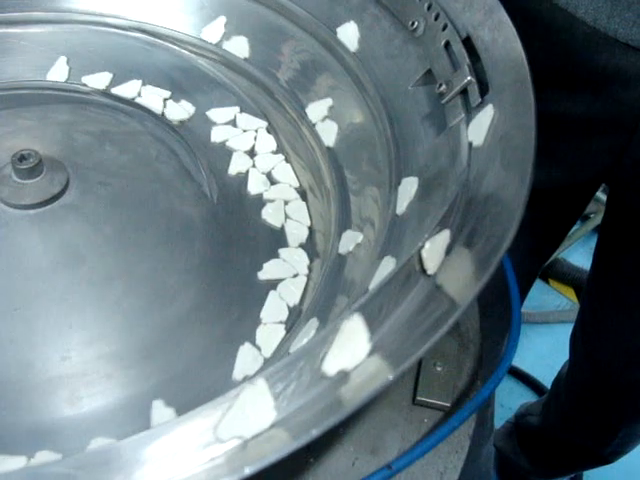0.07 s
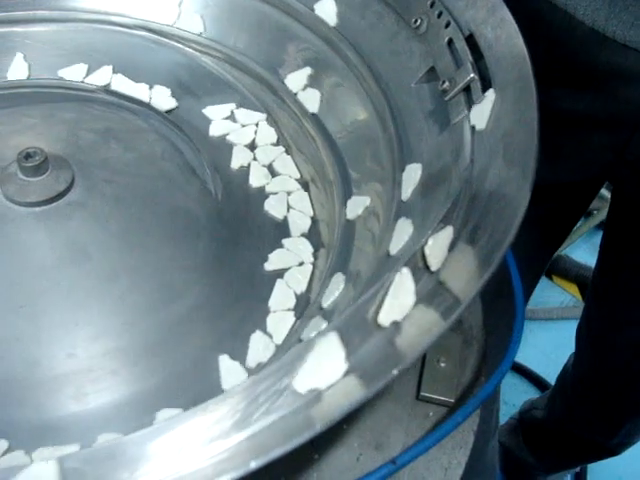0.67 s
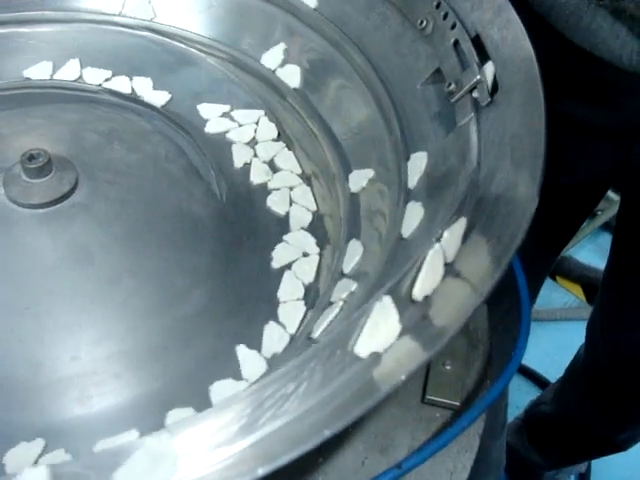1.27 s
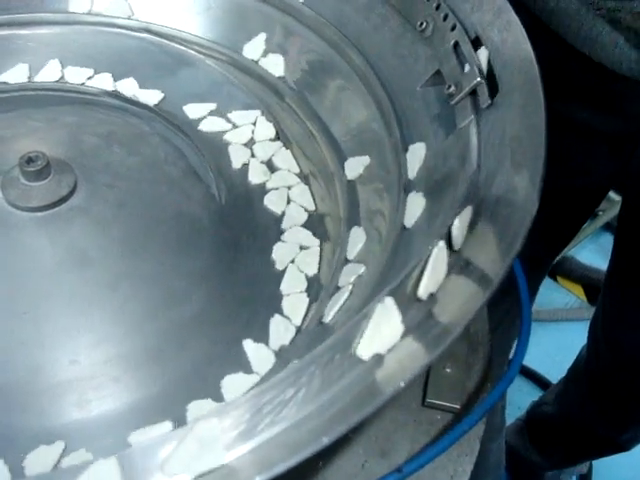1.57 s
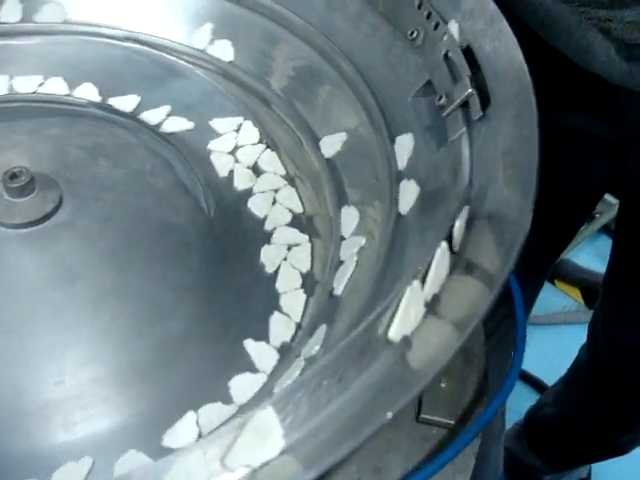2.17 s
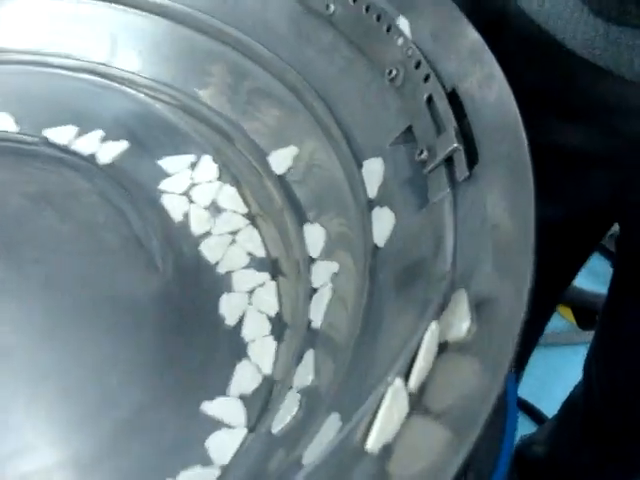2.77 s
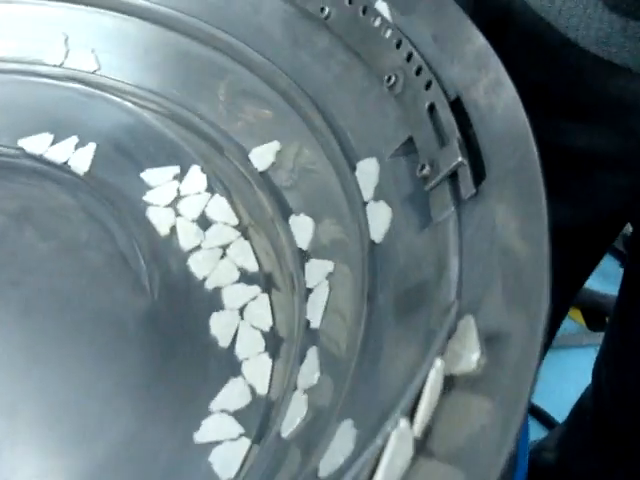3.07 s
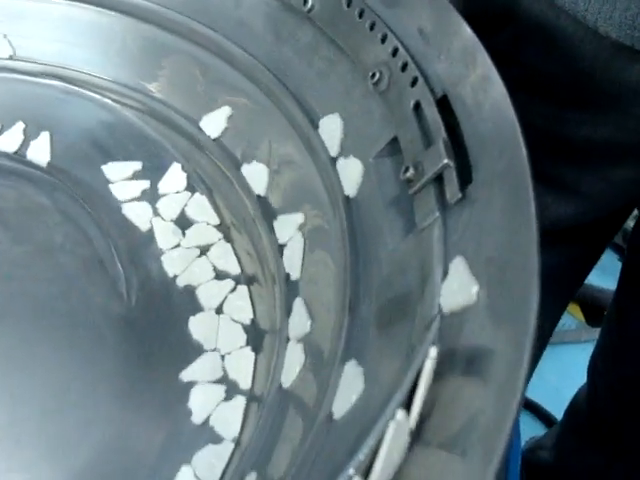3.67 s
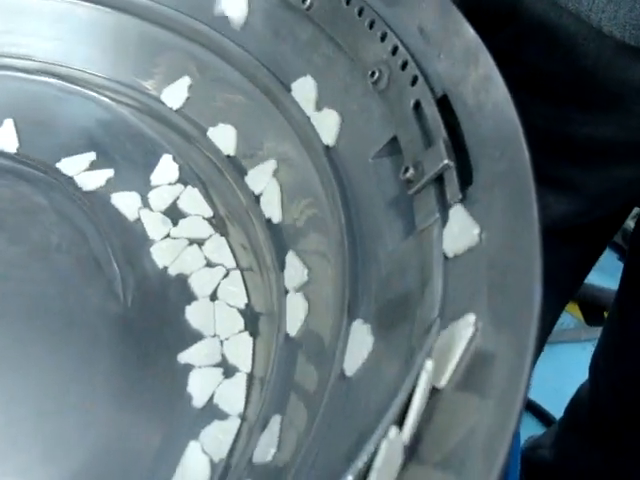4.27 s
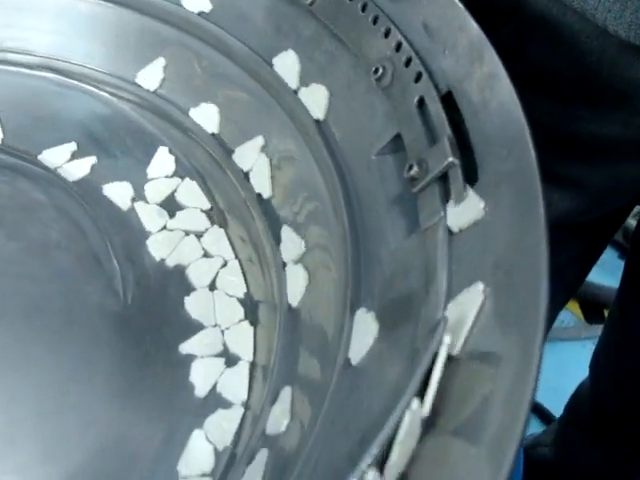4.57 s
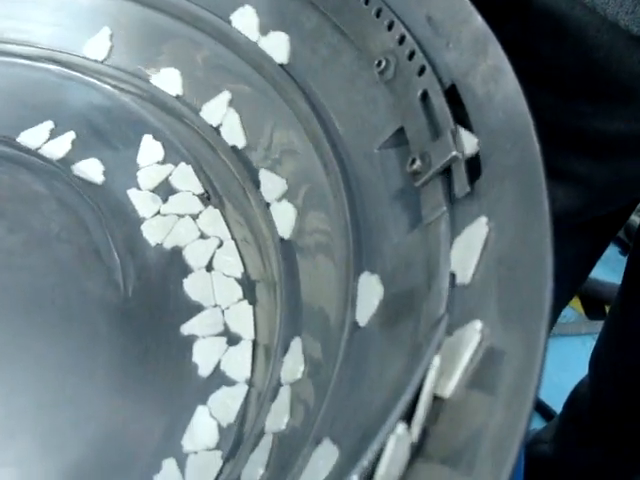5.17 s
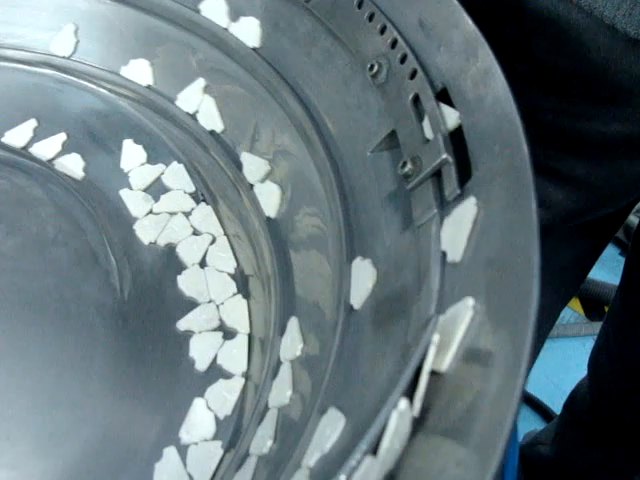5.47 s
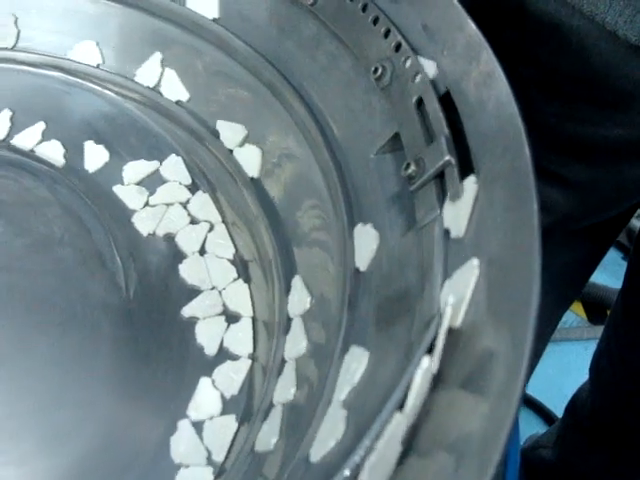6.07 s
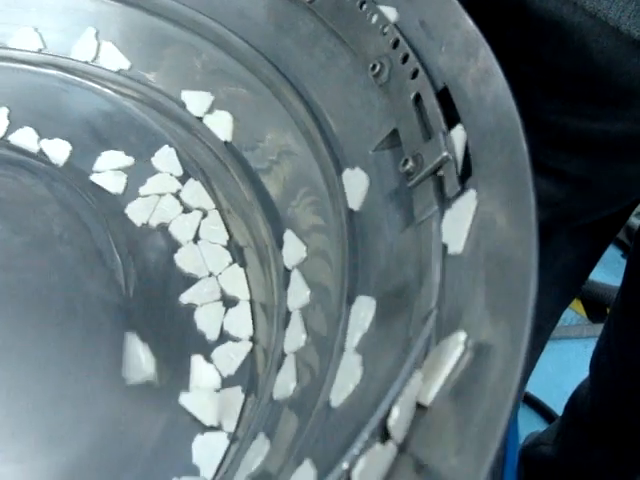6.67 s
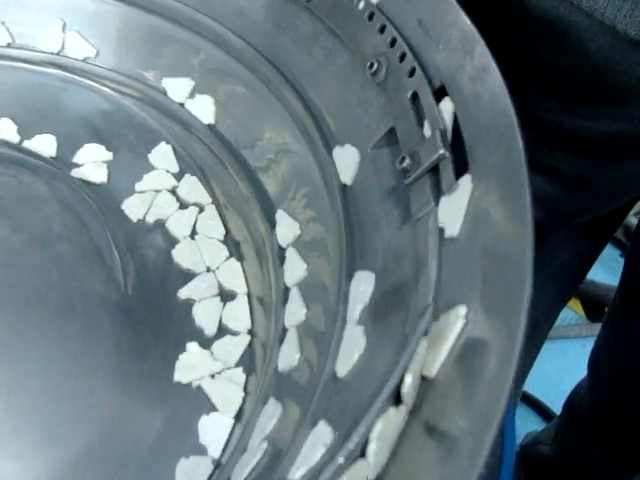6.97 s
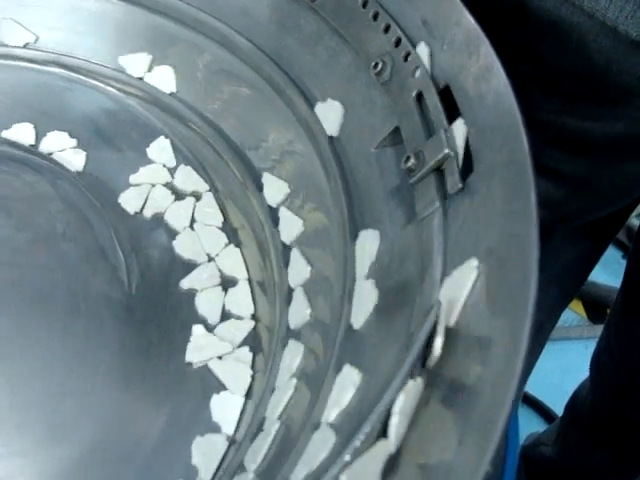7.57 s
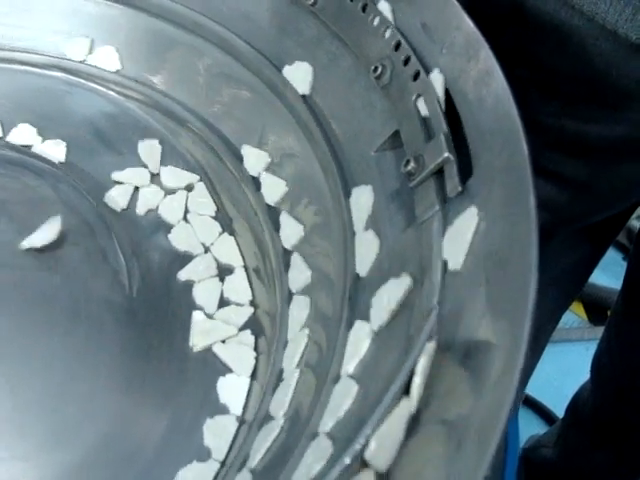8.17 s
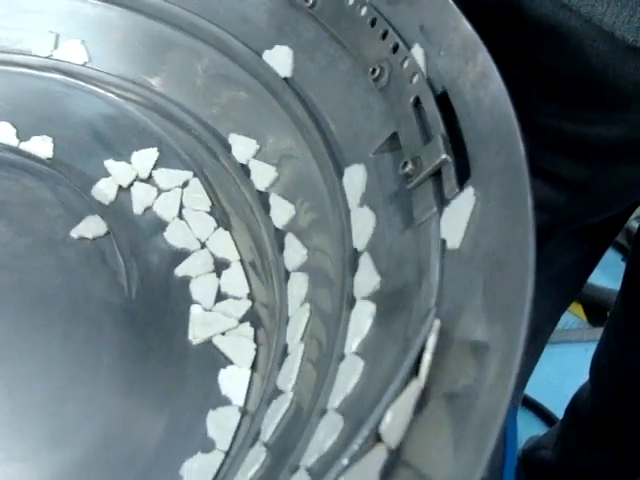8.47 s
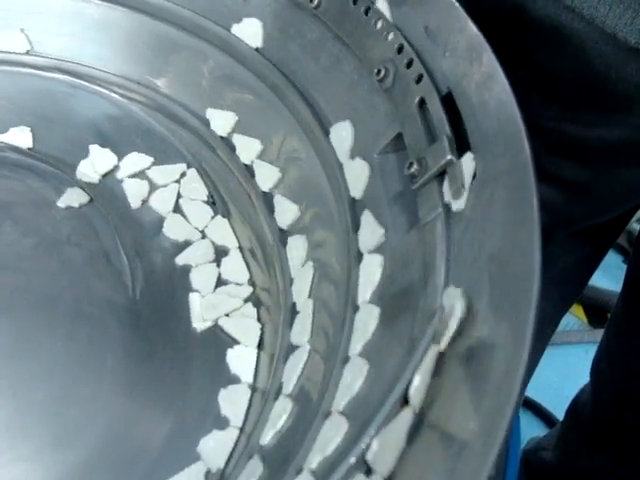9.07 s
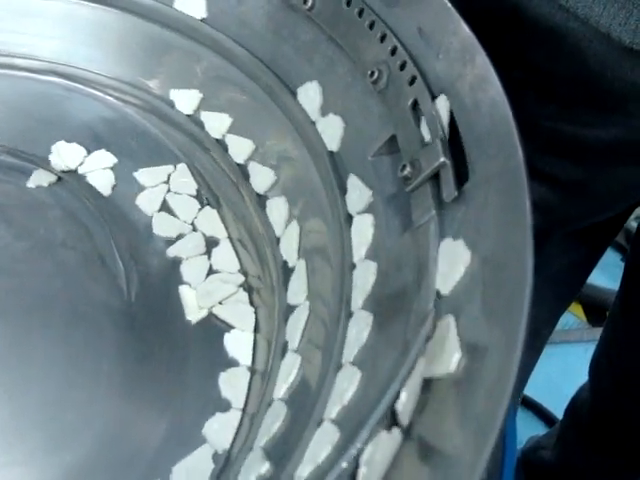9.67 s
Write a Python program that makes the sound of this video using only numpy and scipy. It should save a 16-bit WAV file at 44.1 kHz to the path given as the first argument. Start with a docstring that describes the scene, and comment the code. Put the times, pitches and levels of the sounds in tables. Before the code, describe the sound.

A vibrating steel feeder bowl rattles and buzzes loudly and steadily, with small ceramic pieces chattering along its tracks.

```python
"""A vibratory bowl feeder shakes small ceramic pieces up its steel tracks, heard close by in a workshop.
From the start the magnet drive hums, the bowl knocks at both ends of its stroke and the pieces hop and
land; a wall mode sings, slipping out of step and surging back. From about 1 s pieces bunch up at times.
Between 2 and 4 s the microphone moves from beside the rim, through a quiet zone, to over the bowl.
Near 6.6 and 7.9 s a rejected piece drops to the bowl's floor with a soft thud."""
import sys
import numpy as np
from scipy import signal
from scipy.fft import rfft, irfft
from scipy.io import wavfile
from scipy.ndimage import uniform_filter1d

SR = 44100
rng = np.random.default_rng(int(sys.argv[2]) if len(sys.argv) > 2 else 0)


def pcm_store(signal):
    """Save signal as 16-bit PCM."""
    levels = np.round(np.clip(np.atleast_2d(signal), -1, 1) * 32767)
    wavfile.write(sys.argv[1], SR, levels.astype(np.int16).T)


N = 437031
T = np.arange(N) / SR
MAINS_HZ = 50.05  # one stroke per mains cycle
FLEX_ORDER, SING_ORDER = 6, 14  # multiples of the mains

# rejected pieces drop to the bowl's floor: t/s, thud level/dB
DROPS = [(6.635, -43), (7.94, -54)]


def undb(db):
    """Decibels to gain."""
    return 10 ** (np.asarray(db) / 20)


def unit(x):
    """Scale to rms 1."""
    return x / np.sqrt(np.mean(x ** 2))


def curve(table, t=T):
    """The columns of a table, joined by straight lines in time."""
    times, *columns = np.transpose(table)
    return [np.interp(t, times, column) for column in columns]


def walk(rate_hz):
    """Smooth random wander with rms 1."""
    coarse = T[::100]
    f = np.fft.rfftfreq(len(coarse), coarse[1])
    spectrum = rfft(rng.standard_normal(len(coarse))) / (1 + (f / rate_hz) ** 4)
    return np.interp(T, coarse, unit(irfft(spectrum, len(coarse))))


def band(x, lo_hz, hi_hz):
    """Band-pass without phase shift."""
    return signal.sosfiltfilt(signal.butter(3, [lo_hz, hi_hz], "band", fs=SR, output="sos"), x)


def blend(over, at_rim, over_bowl):
    """Crossfade with the microphone's place: 0 beside the rim, 1 over the bowl."""
    return (1 - over) * at_rim + over * over_bowl


def hops(phase, spread, wander, scatter_db, swell_db):
    """One blow a stroke, now harder, now softer; phase, spread and wander are fractions of a stroke."""
    strokes = np.arange(int(N / SR * MAINS_HZ))
    drift, swell, jitter, force = rng.standard_normal((4, len(strokes)))
    drift, swell = (unit(uniform_filter1d(x, size=25)) for x in (drift, swell))
    at_s = (strokes + phase + wander * drift + spread * jitter) / MAINS_HZ
    return np.bincount((at_s * SR).astype(int) % N, undb(scatter_db * force + swell_db * swell), N)


def strike_steel(blows, t60, tick):
    """Blows on one spot of steel: each a hard tick, then a dense metallic ring."""
    t = T[:SR // 10]
    tail = rng.standard_normal(len(t)) * undb(-60 * t / t60)
    return signal.oaconvolve(blows, tail / np.linalg.norm(tail) + tick * (t == 0))[:N]


def landings(groups=20):
    """Groups of pieces land on their own spots of track: on the upstroke, on the return or anywhere."""
    out = 0
    for _ in range(groups):
        up = hops(rng.normal(.46, .06), spread=.03, wander=.04, scatter_db=3, swell_db=2.5)
        back = hops(rng.normal(.9, .05), spread=.03, wander=.04, scatter_db=4, swell_db=1)
        loose = sum(hops(rng.random(), spread=.15, wander=.15, scatter_db=3, swell_db=2.5)
                    for _ in range(2))
        out = out + strike_steel(up + undb(-3.5) * back + undb(-3) * loose, t60=.075, tick=.6)
    return unit(out) * undb(.61 * walk(28))  # the whole load shifts and settles


def clinks(lo_hz, hi_hz, t60, count=36):
    """Pieces jostle each other in fits; each gives a short ping at its own pitch."""
    t, out = T[:SR // 10], 0
    for hz in np.geomspace(lo_hz, hi_hz, count) * (1 + .018 * rng.standard_normal(count)):
        ping = np.sin(2 * np.pi * hz * t) * undb(-60 * t / t60)
        blows = hops(rng.random(), spread=.15, wander=.1, scatter_db=4.5, swell_db=-1)
        out = out + signal.oaconvolve(blows, ping)[:N]
    return unit(out)


def knocks():
    """The bowl strikes its stop at both ends of the stroke, with nearly exact timing."""
    main = hops(.32, spread=.0024, wander=.0027, scatter_db=.5, swell_db=2.2)
    back = hops(.78, spread=.0046, wander=.005, scatter_db=0, swell_db=1.4)
    steel = sum(strike_steel(blows, t60=.038, tick=.51) for blows in (main, undb(-3) * back))
    return unit(band(steel, 900, 5700))


def ring(blows, body, modes, peak_scale, width_scale, size=8192):
    """A resonator: a broad colour with ringing modes on top."""
    f = np.fft.rfftfreq(size, 1 / SR) + 1
    body_hz, body_db = np.transpose(body)
    db = np.interp(np.log(f), np.log(body_hz), body_db)
    for hz, width, peak in modes:
        db = db + peak_scale * peak / (1 + ((f - hz) / (width_scale * width)) ** 2)
    # minimum phase, so the ring follows the blow
    cepstrum = irfft(np.log(undb(db)))
    response = irfft(np.exp(rfft(2 * cepstrum[:size // 2], size)))
    return unit(signal.oaconvolve(blows, response)[:N])


def bowl(blows, over):
    """The steel bowl rings with one colour beside the rim and another from above."""
    # broad colour at each place: f/Hz, level/dB
    rim_body = [(150, -20), (250, -6.5), (450, -11.5), (700, -2), (1150, -7.5), (1900, -4.5), (2400, -7),
                (2700, -5), (3800, -0.5), (4400, -4), (5500, -3), (6300, -8), (7900, -5), (9900, -5)]
    over_body = [(150, -19), (250, -13.5), (450, -15), (700, -4), (1150, -8.5), (1500, -10.5), (2500, -6),
                 (3300, -1), (4000, -1.5), (5200, -4), (6400, -6.5), (7600, -6.5), (8700, -9), (9900, -7.5)]
    # bowl modes at each place, before scaling: f/Hz, width/Hz, peak over the body/dB
    rim_modes = [(1250, 29, -4), (1330, 200, 6.5), (1410, 32, 9), (1642, 94, 10), (1875, 62, 8.5),
                 (1960, 22, 8.5), (2260, 60, 5), (2302, 33, 9.5), (2623, 130, 7), (2780, 65, 6),
                 (2980, 57, 8.5), (3500, 80, 4.5), (3766, 130, 6), (4100, 89, 9.5)]
    over_modes = [(1224, 34, 13.5), (1433, 35, 5.5), (1629, 69, 11), (1886, 83, 16), (2050, 60, 6.5),
                  (2240, 170, 3), (2282, 49, -2), (2418, 14, 12.5), (2617, 88, 8), (2800, 76, 13),
                  (2944, 23, 1.5), (3086, 19, 11), (3788, 160, 4.5), (3885, 130, 5), (4023, 140, 7),
                  (4160, 86, 9.5), (4970, 66, -12)]
    rim = ring(blows, rim_body, rim_modes, peak_scale=1, width_scale=.34)
    above = ring(blows, over_body, over_modes, peak_scale=.91, width_scale=.28)
    return unit(band(blend(over, rim, above), 105, 8160))


def rattle(over):
    """Blows ring the bowl; as the microphone leaves the rim, chatter swells then fades and fizz rises."""
    # the rattle's levels over time, before offsets: t/s, overall level/dB, wall chatter/dB, ceramic fizz/dB
    levels = [(0.1, -21.5, -7.5, -13.5), (1.36, -21.5, -8, -14), (2.52, -22, -4, -13),
              (2.57, -21.5, -7.5, -9.5), (3.83, -21, -11.5, -9.5), (8.62, -20.5, -13, -10),
              (8.97, -20.5, -13.5, -9.5), (9.75, -21, -11, -10)]
    level_db, chatter_db, fizz_db = curve(levels)
    blows = landings() + undb(-9) * clinks(lo_hz=4466, hi_hz=9975, t60=.03)
    blows = blows + blend(over, undb(-14), undb(-11.5)) * knocks()
    ringing = bowl(blows, over)
    chatter, fizz = band(ringing, 2440, 3230), band(ringing, 8700, 11300)
    body = undb(.29) * (ringing - chatter - fizz)
    mix = body + undb(chatter_db + 1.2) * unit(chatter) + undb(fizz_db + 3) * unit(fizz)
    mix = mix + (quiet_zone(over, loss_db=1.5) - 1) * band(mix, 900, 2400)
    return wall_notch(bunching(mix) * undb(level_db), width_hz=350)


def wall_notch(x, width_hz):
    """The path difference off the wall cancels or lifts one band, which slides with the microphone."""
    # the sliding band: t/s, f/Hz, cut/dB (negative lifts)
    notch = [(2.1, 7300, -4), (2.55, 5860, 7), (2.85, 6440, 3), (3.15, 7660, 0), (3.7, 8000, -1.5),
             (8, 7600, 1)]
    f, t, spectra = signal.stft(x, SR, nperseg=512)
    hz, depth_db = curve(notch, t)
    cut_db = depth_db * np.exp(-((f[:, None] - hz) / width_hz) ** 2)
    return signal.istft(spectra * undb(-cut_db), SR)[1][:N]


def magnet_hum(mains):
    """The magnet hums at twice and three times the mains rate."""
    second = undb(-45.5 + .35 * walk(2)) * np.sin(2 * mains)
    third = undb(-53 + 2.6 * walk(21)) * np.sin(3 * mains)
    return second + third


def flexing(stroke, over):
    """The bowl flexes with the stroke: one low, slightly shaky tone."""
    level = undb(-36 + 1.04 * walk(45) + .53 * walk(4.7)) * quiet_zone(over, loss_db=6)
    return level * np.sin(FLEX_ORDER * stroke)


def singing_mode(stroke, over, gap_db, surge_db, flutter_hz=10, steadying_db=4.5):
    """A wall mode sings and flutters, steadier the harder it surges."""
    flutter = blend(over, 1.1, 2.5) * np.sin(2 * np.pi * flutter_hz * T + 1.8 * walk(4.5))
    flutter_db = (flutter + .9 * walk(30)) * np.exp(-surge_db / steadying_db)
    return undb(-29.5 + surge_db - gap_db + flutter_db) * np.sin(SING_ORDER * stroke)


def buzz(stroke, over, surge_db, lateness, dispersion=.7):
    """The repeating knocks buzz in the wall as a stack of mains harmonics."""
    # harmonic balance, by multiple of the mains: level beside the rim/dB, level over the bowl/dB
    harmonics = {4: (-31, -32), 5: (-22.5, -27), 7: (-13, -14), 8: (-14, -26.5), 9: (-21, -14.5),
                 11: (-19.5, -19), 12: (-10, -10), 13: (-10, -2.5), 15: (-16.5, -10.5), 16: (-9, -5),
                 18: (-17, -14), 19: (-13.5, -4.5), 20: (-13, -12.5), 21: (-11, -14), 22: (-14.5, -19),
                 24: (-13.5, -9), 26: (-14, -20), 27: (-9, -15.5), 28: (-9.5, -16.5)}
    out = 0
    for order, (rim_db, over_db) in harmonics.items():
        db = blend(over, rim_db, over_db) + 1.2 * walk(6.7) + 1.87 * walk(1.3)
        # a surge evens out the two half strokes: odd orders lose, even ones gain
        db = db + surge_db * (-.52 if order % 2 else .45)
        # a late knock drives the orders just above the singing mode harder
        db = db + lateness * 4.7 * np.exp(-((order - 19.3) / 3.1) ** 2)
        # bending waves are dispersive: the phase shifts more the further from the singing mode
        shift = dispersion * (order - SING_ORDER) ** 2 + .5 * rng.standard_normal()
        out = out + undb(db) * np.sin(order * stroke + shift)
    return out * undb(blend(over, -35.5, -34)) * quiet_zone(over, loss_db=5)


def drive(over):
    """The machine's tones; uneven stroke timing roughens the higher orders more."""
    gap_db, surge_db, late_ms = slips()
    lateness = np.clip(late_ms / .52, 0, 1)
    # the knock's timing is shaky, most of all while it comes late
    lead_ms = .056 * walk(6.8) + (.026 + .037 * lateness) * walk(40) - late_ms
    mains = 2 * np.pi * MAINS_HZ * T
    stroke = mains + 2 * np.pi * MAINS_HZ * lead_ms / 1000
    low_tones = magnet_hum(mains) + flexing(stroke, over)
    wall_tones = singing_mode(stroke, over, gap_db, surge_db) + buzz(stroke, over, surge_db, lateness)
    return np.sqrt(2) * (low_tones + wall_tones)


def slips(catch_s=.13, release_s=.042, sag_s=1.8, late_peak_s=.054, late_spread_s=.15):
    """The shifting load knocks the singing mode out of step; it drops out, catches and surges."""
    # slips: t/s, gap half length/s, gap depth/dB, surge before sag/dB, surge length/s, knock delay/ms
    cues = [(-.06, .01, 0, 3.5, 0.35, 0.03), (1.13, 0.027, 35, 0, .73, .55), (1.92, 0.044, 17, -3, .6, 0),
            (2.591, 0.047, 22, -5, 0.4, 0.1), (3.2, 0.078, 17, 3, .68, 0), (3.95, 0.017, 19, 6, .08, 0.77),
            (4.07, 0.036, 14, 6.5, .72, 0.43), (4.88, 0.06, 4, 5.5, 0.24, 0.24),
            (5.721, .045, 9, 2, 0.17, 0.2), (5.93, 0.018, 12, 5.5, 0.37, 0.06),
            (6.47, 0.019, 7, 4.5, 0.27, 0.3), (8.161, 0.038, 17, 5, 0.32, 0.24),
            (8.6, .03, 7, 4.5, 0.23, 0), (8.91, 0.026, 6, -1.5, .1, 0.1), (9.11, 0.028, 12, 0, .2, 0.1),
            (9.46, .025, 16, 6.5, .4, 0.7)]
    gap_db = surge_db = late_ms = 0
    for at_s, half_s, depth_db, lift_db, hold_s, delay_ms in cues:
        age = T - at_s
        gap_db = gap_db + depth_db * np.exp(-(age / half_s) ** 2)
        held = np.clip(age / catch_s, 0, 1) * np.clip(1 - (age - hold_s) / release_s, 0, 1)
        surge_db = surge_db + lift_db * held * np.exp(-np.abs(age) / sag_s)
        late_ms = late_ms + delay_ms * np.exp(-((age - late_peak_s) / late_spread_s) ** 2)
    return gap_db, surge_db, late_ms


def workshop():
    """A faint bed of low room rumble."""
    return undb(-65) * unit(band(rng.standard_normal(N), 15, 130))


def bunching(x):
    """Pieces bunch up on the track and drive the wall's middle modes harder for a moment."""
    # bursts of chatter: t/s, half length/s, swell/dB
    bunches = [(1.25, .05, 2.5), (2.12, .04, 3), (2.322, 0.035, 3.5), (4.233, 0.065, 0.5)]
    swell_db = sum(db * np.exp(-((T - at_s) / half_s) ** 2) for at_s, half_s, db in bunches)
    return x + (undb(swell_db) - 1) * band(x, 2560, 4500)


def quiet_zone(over, loss_db, place=.48, width=.17):
    """The gain falls as the microphone passes a part of the wall that hardly moves."""
    return undb(-loss_db * np.exp(-((over - place) / width) ** 2))


def drops(thud_hz, t60):
    """Each falling piece rocks the bowl on its springs."""
    out = 0
    for at_s, db in DROPS:
        age = np.maximum(T - at_s, 0)
        out = out + undb(db - 60 * age / t60) * np.sin(2 * np.pi * thud_hz * age)
    return out


def dips(depth_db, hold_s):
    """The level dips briefly after each falling piece."""
    return undb(-depth_db * sum(np.exp(-((T - at_s - hold_s) / hold_s) ** 2) for at_s, _ in DROPS))


def scene():
    """The feeder over the rumble of the workshop, the same in both ears."""
    # microphone move: t/s, place (0 beside the rim, 1 over the bowl)
    path = [(2.2, 0.075), (2.7, 0.47), (3.2, 0.5), (3.6, 0.82), (4.1, 0.97)]
    over = np.clip(curve(path)[0], 0, 1)
    feeder = rattle(over) * dips(depth_db=1.5, hold_s=.055) + drive(over)
    mono = feeder + drops(thud_hz=55, t60=.1) + workshop()
    return np.array([mono, mono])


def record(dry, start_s=.043, top_hz=10050):
    """The sound cuts in just after the start; a steep low-pass takes off the top."""
    fade_in = np.clip((T - start_s) / .002, 0, 1)
    return signal.sosfilt(signal.ellip(14, .2, 95, top_hz, fs=SR, output="sos"), dry * fade_in)


dry = scene()
out = record(dry)
pcm_store(out)
```